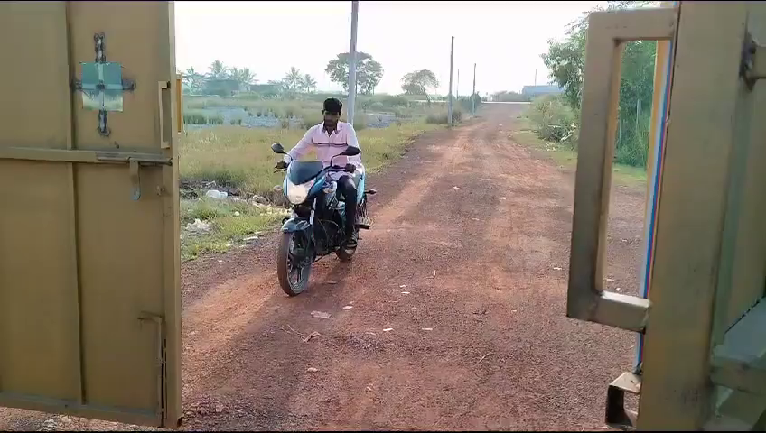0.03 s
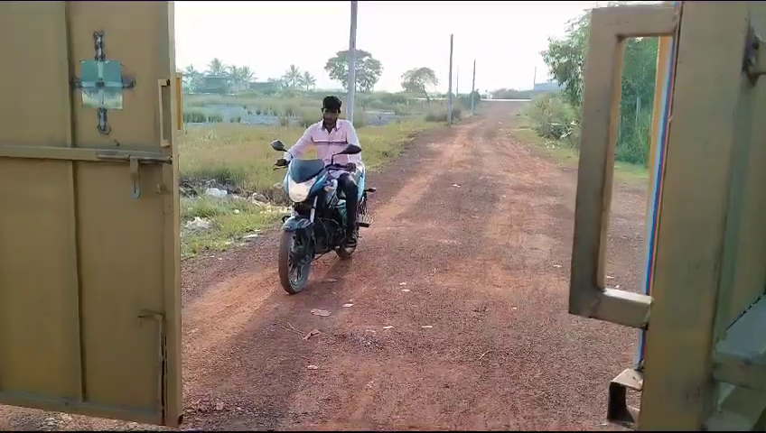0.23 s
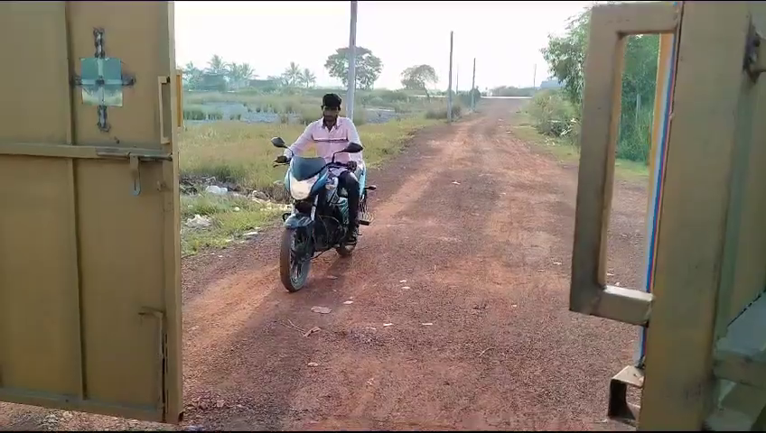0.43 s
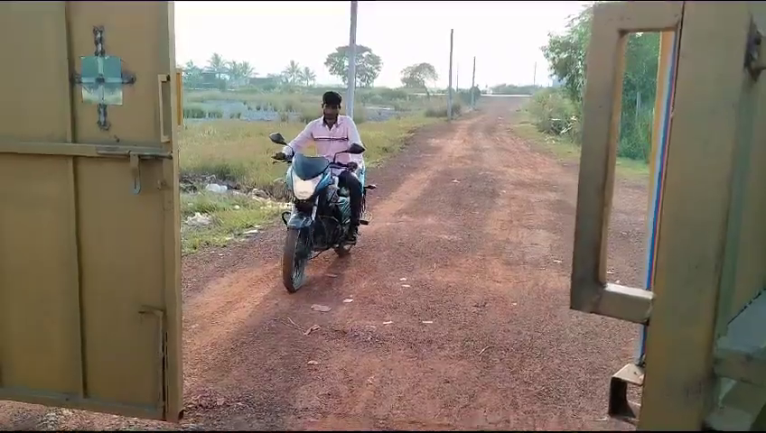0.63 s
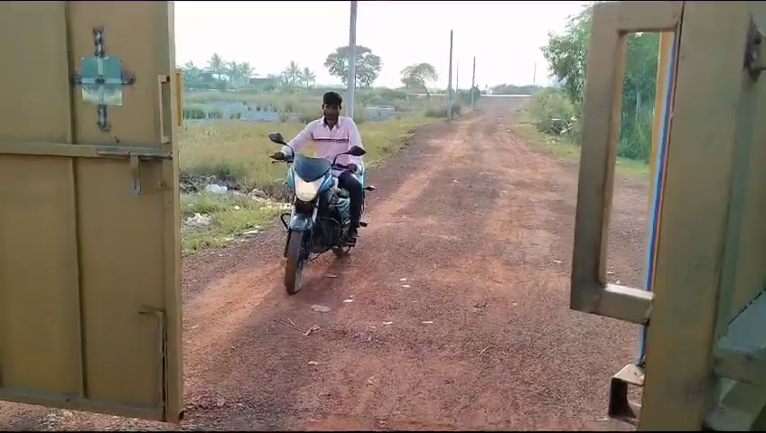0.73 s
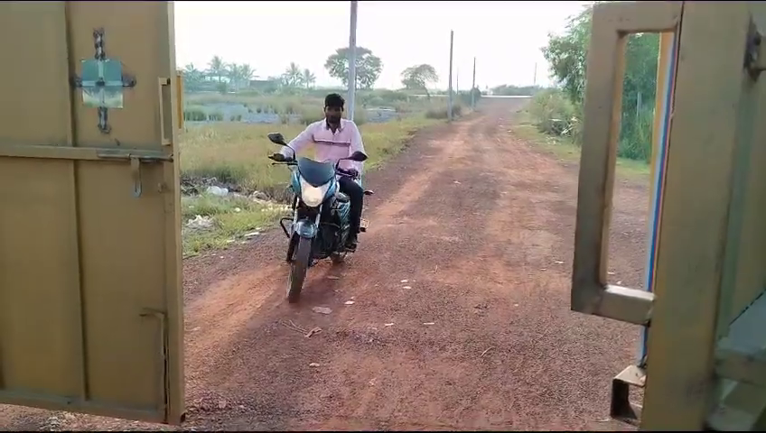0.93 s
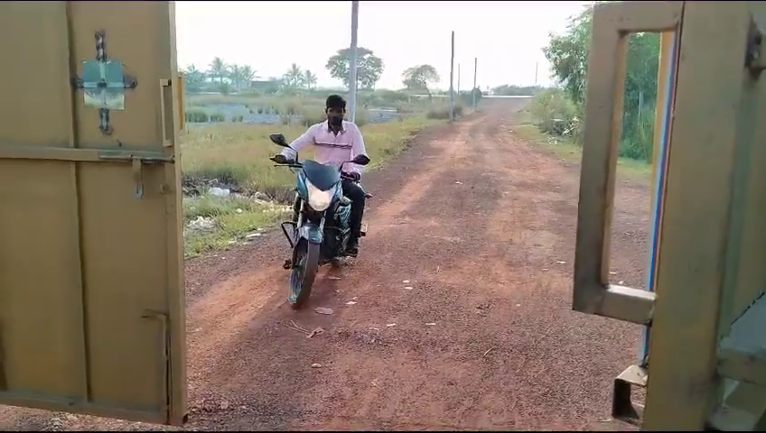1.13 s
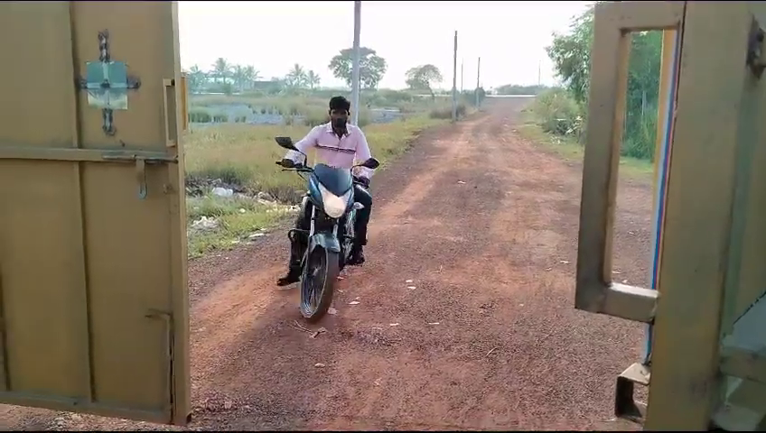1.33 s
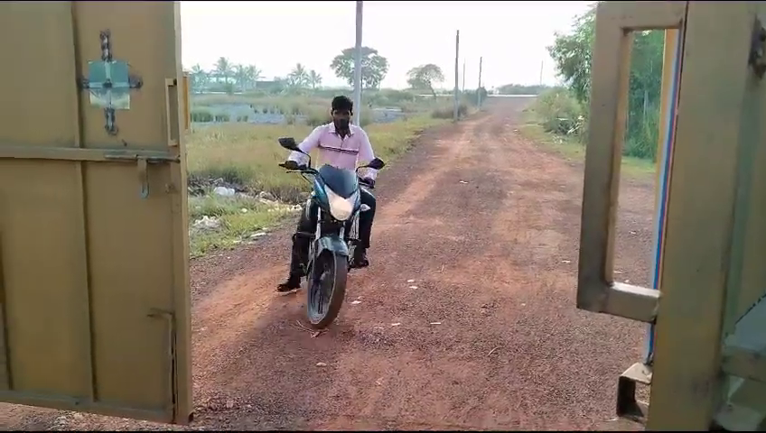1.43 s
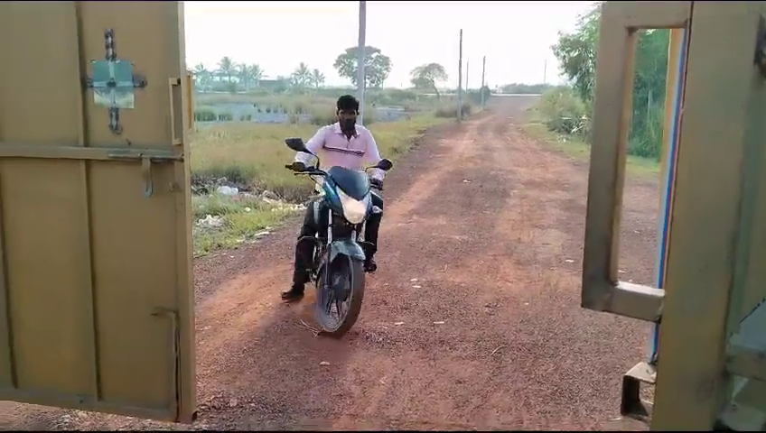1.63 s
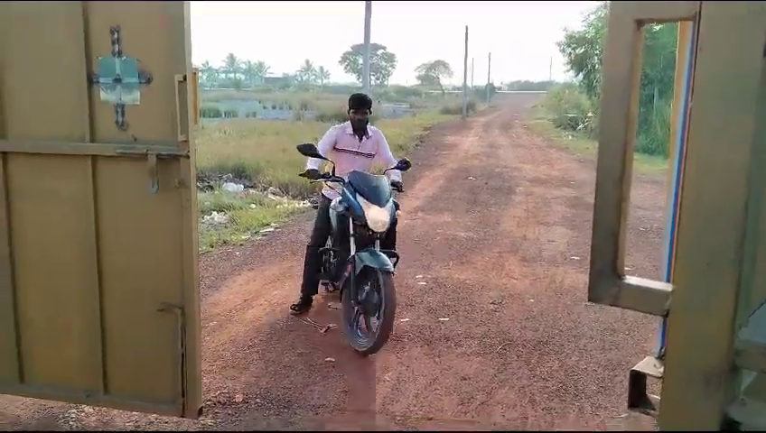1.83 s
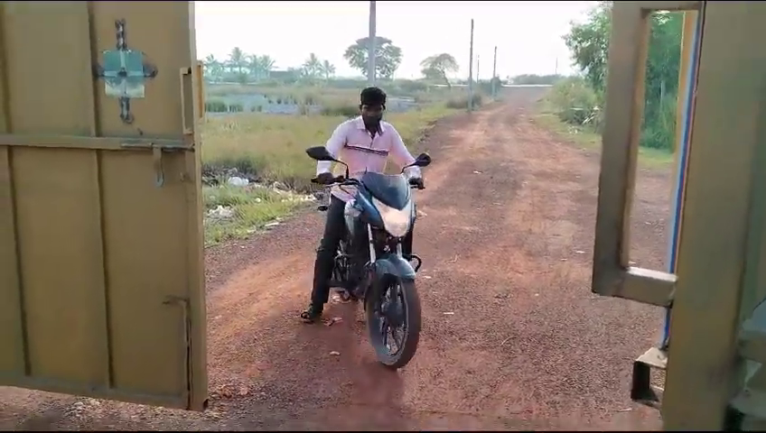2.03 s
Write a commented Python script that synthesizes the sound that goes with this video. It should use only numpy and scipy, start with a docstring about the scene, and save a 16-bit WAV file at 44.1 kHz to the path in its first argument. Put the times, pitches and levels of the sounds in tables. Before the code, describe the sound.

A single-cylinder motorcycle cuts in after a brief silence, puttering briskly with gear whine and rattle, then slows to a lumpy idle over snapping grit and revs slightly at the end; outdoors, close stereo microphone.

```python
"""A short silence, then a single-cylinder four-stroke motorcycle at a brisk beat, rolling up a dirt yard
towards a steel gate; it slows to idle and picks up again. Exhaust blows ring in the pipe over a noise rumble,
gear tones whine with the crank, grainy noise rattles the cases and a burst ticks the valve once a cycle.
Ringing clanks, brief low tones and pitched grit snaps join in; a pair of microphone ports hears it all."""
import sys
import numpy as np
from scipy import signal
from scipy.io import wavfile
from scipy.ndimage import uniform_filter1d

SR = 44100
rng = np.random.default_rng(int(sys.argv[2]) if len(sys.argv) > 2 else 0)


def generate_wav(signal):
    """Clip the signal to [-1, 1] and save it as 16-bit WAV at the path in sys.argv[1]."""
    frames = np.transpose(np.atleast_2d(signal))
    scaled = np.clip(frames, -1, 1) * 32767
    pcm = np.round(scaled).astype(np.int16)
    wavfile.write(sys.argv[1], SR, pcm)


def invert_db(level):
    """Linear amplitude ratio for a level in decibels (20 dB per decade), elementwise."""
    return 10 ** (np.asarray(level, dtype=float) / 20)


N = 91463

# Engine speed: time_s, firings_per_s
ENGINE_SPEED = [(0.2, 24.2), (0.32, 24.9), (0.45, 25.55), (0.56, 24.5), (0.66, 23.07), (0.76, 22.3),
                (0.88, 18.92), (1.0, 15.68), (1.12, 12.8), (1.25, 10.87), (1.45, 8.49), (1.68, 8.41),
                (1.85, 9.99), (2.08, 15.22)]
# Load on the engine: time_s, exhaust_db, rattle_db
ENGINE_LOAD = [(.24, -44.5, -39.5), (.4, -47.5, -37), (.51, -44.5, -35.5), (.555, -38, -38.5),
               (.6, -44, -36), (.64, -38, -37.5), (.69, -52, -37), (.77, -51, -38.5), (.82, -43.5, -39.5),
               (.94, -60, -40), (1.08, -46.5, -43.5), (1.28, -77, -42), (1.37, -65, -45.5),
               (1.47, -53.5, -42), (1.64, -58, -46), (1.75, -52, -46), (1.86, -43.5, -41.5),
               (1.91, -85, -44.5), (1.945, -46, -35.5), (1.99, -38, -43.5), (2.025, -46.5, -34.5),
               (2.07, -41, -40)]
# Exhaust pipe modes: pitch_hz, level_db (relative), t60_s
PIPE_MODES = [(126, -2.5, 0.064), (157.3, 1.5, 0.049), (199.5, -4.5, 0.046), (245.6, -6.5, 0.074),
              (305, -7, 0.065)]
# Colour of the gas rumble: pitch_hz, density_db (relative, per Hz)
RUMBLE_COLOUR = [(20, -15), (45, -4), (86, -10), (156, 0.5), (335, -8), (441, -16.5), (700, -25)]
# Gas rumble over time: time_s, level_db
RUMBLE_LEVELS = [(.24, -41.5), (.55, -43), (.85, -43), (1.1, -50), (1.4, -48.5), (1.7, -50), (2.07, -44.5)]
# Gear whine: time_s, then level_db of mesh multiples 1, 2, 3 and 4
WHINE_LEVELS = [(.23, -46.5, -45, -44.5, -56), (.36, -46, -43, -46.5, -54), (.48, -40.5, -39, -48.5, -52),
                (.58, -44.5, -46.5, -43, -45), (.72, -40.5, -49, -43, -49.5), (.86, -49, -47.5, -45.5, -53),
                (.98, -56, -46.5, -51, -52), (1.15, -57, -55, -62, -62), (1.35, -80, -80, -80, -80)]
# Colour of the rattle at high speed: pitch_hz, density_db (relative, per Hz)
FAST_COLOUR = [(350, 2), (444, -12.5), (909, -6.5), (1490, -14), (1920, -12), (2900, -15), (3190, -15),
               (3680, -14.5), (4390, -16), (7070, -20.5), (9110, -44.5), (15600, -48)]
# Colour of the rattle at idle: pitch_hz, density_db (relative, per Hz)
IDLE_COLOUR = [(350, -20.5), (538, -16), (591, -28), (651, -12), (800, -6), (1460, -9), (2440, -13),
               (3090, -11.5), (3460, -10.5), (7070, -21.5), (9260, -54), (15600, -50.5)]
# Resonances of the engine cases, plus a bright lift high in the treble (last row): pitch_hz, width_hz, lift_db
CASE_MODES = [(823, 140, 4), (907, 540, 3.5), (2482, 173, 8), (2786, 15, 11), (3610, 300, 7),
              (5780, 940, 5.5), (11570, 780, 9)]
# Valve modes: pitch_hz, level_db (relative), t60_s
VALVE_MODES = [(5450, 0, .014), (5900, -1, .014), (4150, -8, .015)]
# Valve tick over time: time_s, gain_db
TICK_GAINS = [(.24, -41), (.78, -42), (.84, -35), (1.02, -35), (1.08, -46), (1.15, -36), (1.25, -48)]
# Drive-train clanks as the load comes on: start_s, strength_db, rise_s
CLANK_TIMES = [(1.922, -53, 0.0086), (1.962, -55.5, 0.0056), (2.003, -52, 0.006), (2.035, -46, 0.0053)]
# Drive-train modes: pitch_hz, level_db (relative), t60_s
CLANK_MODES = [(910, -3, .03), (1500, -9, .012), (2422, -2, .025), (2885, -7, .02), (3575, 0, .02),
               (4188, -5, .015), (5443, -6, .015), (6896, -7, .01)]
# Low tones that swell for a moment: start_s, length_s, pitch_hz, level_db
LOW_TONES = [(0.267, 0.49, 328.6, -45), (0.35, 0.22, 152, -40.5), (0.562, 0.075, 295, -37.5),
             (0.686, 0.13, 363.7, -47.5), (0.755, 0.24, 248.8, -45.5), (1.106, 0.071, 482, -47.5),
             (1.19, 0.14, 245, -49.5), (1.324, 0.064, 160.2, -38.5)]
# Grit snaps under the tyres: start_s, strength_db, pitch_hz
GRIT_SNAPS = [(1.147, -20.5, 3260), (1.1762, -21, 1820), (1.2036, -22, 1630), (1.2488, -24.5, 2450),
              (1.2595, -44, 4200), (1.2982, -18.5, 2520), (1.3968, -29, 3380), (1.467, -16.5, 4300),
              (1.4787, -18, 3650), (1.5091, -17, 2660), (1.559, -26, 3510), (1.6822, -21, 3270),
              (1.6856, -16.5, 2270), (1.6924, -17, 2930), (1.8088, -19, 3480)]
# Likeness of the two ports: pitch_hz, likeness (1 = identical)
PORT_LIKENESS = [(60, 0.94), (130, 0.96), (290, 1), (640, 0.59), (1410, 0.38), (3100, 0.96), (6820, 0.22),
                 (15000, 0.21)]
# Balance of the ports: pitch_hz, left_minus_right_db
PORT_LEAN = [(60, 2), (130, -2.5), (290, 4), (640, -1.5), (1410, 2.5), (3100, 4), (6820, -7.5),
             (15000, -4.5)]
# Echoes off gate and ground, one row per port: delays_s
PORT_ECHOES = [
    [.0031, .0074, .013, 0.024],
    [.0043, .0062, 0.019, .024],
]

LEFT_LAG_S = .00007


def rms_one(x):
    """Scale a sound to rms 1."""
    return x / np.sqrt(np.mean(x ** 2) + 1e-20)


def in_time(rows):
    """Turn the columns of a timed table into curves."""
    times_s, *columns = np.transpose(rows)
    return [np.interp(np.arange(N) / SR, times_s, column) for column in columns]


def at_hz(points, hz):
    """Read a spectrum table along a log-frequency axis."""
    table_hz, values = np.transpose(points)
    return np.interp(np.log(hz), np.log(table_hz), values)


def drift(rate_hz):
    """Random wander, spread 1: noise through two equal one-pole lowpasses at this rate."""
    r = np.exp(-2 * np.pi * rate_hz / SR)
    noise = rng.standard_normal(N + SR)
    return rms_one(signal.lfilter([1], [1, -2 * r, r * r], noise)[SR:])  # first second lets it settle


def filtered(x, order, hz, kind="low"):
    """Butterworth filter."""
    return signal.sosfilt(signal.butter(order, hz, kind, fs=SR, output="sos"), x)


def ring(clicks, hz, t60_s):
    """Two-pole resonator: a unit click starts a decaying sine of initial height 1."""
    r, w = invert_db(-60 / (t60_s * SR)), 2 * np.pi * hz / SR
    return signal.lfilter([0, np.sin(w)], [1, -2 * r * np.cos(w), r * r], clicks + 1e-18)


def beats(turns, cycle_place, modes, spread_db, burst):
    """One burst per engine cycle excites all modes, with chance strength per blow and per mode."""
    at = np.flatnonzero(np.diff(np.floor(turns - cycle_place)))
    shared_db = rng.normal(0, spread_db, 80)
    out = 0
    for k, (hz, db, t60_s) in enumerate(modes):
        strength_db = db + shared_db + rng.normal(0, spread_db, 80)
        clicks = np.zeros(N)
        clicks[at] = (-1) ** k * invert_db(strength_db)[:len(at)]
        out = out + ring(burst(clicks), hz, t60_s)
    return out


def banded(white, low_hz, count, gain_db, patchy_db):
    """Third-octave stereo noise, each band with its own level, flicker, likeness and lean; left lags."""
    out = 0
    edges = low_hz * 2 ** (np.arange(count + 1) / 3)
    for k, (low, high) in enumerate(zip(edges, edges[1:])):
        mid, side = filtered(white[k % 2], 3, [low, high], "band")  # neighbours use different noise
        hz = np.sqrt(low * high)
        alike = np.clip(at_hz(PORT_LIKENESS, hz), -1, 1)
        half_lean_db = at_hz(PORT_LEAN, hz) / 2
        pair = np.sqrt(1 + alike) * mid + np.sqrt(1 - alike) * side * [[1], [-1]]
        flicker = invert_db(gain_db(hz) + patchy_db * drift(6.6))
        out = out + flicker * pair * invert_db(np.array([[half_lean_db], [-half_lean_db]]))
    out[0] = np.interp(np.arange(N) - LEFT_LAG_S * SR, np.arange(N), out[0])
    return out


def point_source(x, pan_db, echo_db=-13.5):
    """A dulled point source: panned, later on the left, with echoes of alternating sign at each port."""
    t = np.arange(N)
    x = filtered(x, 10, 7340)
    left = np.interp(t - LEFT_LAG_S * SR, t, x) * invert_db(pan_db / 2)
    out = np.array([left, x * invert_db(-pan_db / 2)])
    for port, delays_s in enumerate(PORT_ECHOES):
        for k, delay_s in enumerate(delays_s):
            out[port] += invert_db(echo_db) * (-1) ** k * np.interp(t - delay_s * SR, t, x, left=0)
    return out


def exhaust(turns, speed, level_db):
    """Soft pressure blows excite the pipe modes, once a cycle, over a noise rumble of gas."""
    lead_s, blow_s = 0.0121, .0022  # a blow starts this lead before its peak
    r = np.exp(-1 / (blow_s * SR))

    def soft_blow(clicks):
        """Slope of a pressure pulse that swells and dies."""
        return signal.lfilter([1, -1], [1, -2 * r, r * r], clicks)

    blows = beats(turns + lead_s * speed, 0.81, PIPE_MODES, spread_db=2.0, burst=soft_blow)
    blows = point_source(filtered(blows, 2, [110, 380], "band"), pan_db=-1.2, echo_db=-22.0)
    # even out the running level so that the load curve sets it
    blows = blows / np.sqrt(uniform_filter1d(np.mean(blows ** 2, axis=0), size=9000) + 1e-12)
    white = rng.standard_normal((2, 2, N))
    rumble = banded(white, 24.42, 14, lambda hz: at_hz(RUMBLE_COLOUR, hz), patchy_db=0.5)
    return invert_db(level_db) * blows + invert_db(in_time(RUMBLE_LEVELS)[0]) * rms_one(rumble)


def whine(turns):
    """Gear-mesh multiples follow the crank, which surges within each cycle; chance blurs each line."""
    teeth_per_firing, crank_ripple = 40.1, .014
    swell_db, rough_rad, wobble_hz = 3, 1.2, 50
    surge = crank_ripple * np.sin(2 * np.pi * turns) / (2 * np.pi)
    mesh = teeth_per_firing * (turns + surge)
    out = 0
    for multiple, db in enumerate(in_time(WHINE_LEVELS), 1):
        blur = invert_db(swell_db * drift(wobble_hz)) * np.exp(1j * rough_rad * drift(wobble_hz))
        line = np.real(blur * np.exp(2j * np.pi * multiple * mesh))
        out = out + invert_db(db) * rms_one(line)
    return point_source(out, pan_db=2.5)


def rattle(speed, level_db):
    """Dense grainy contacts, as flickering noise, ring the cases; their colour follows engine speed."""
    fast = np.clip((speed - 11) / 12, 0, 1)
    grain_db, chatter_db = 1.24 * drift(380), 1.53 * drift(54)
    white = rng.standard_normal((2, 2, N)) * invert_db(grain_db + chatter_db)

    def colour(hz):
        """Blend the idle and high-speed spectra."""
        return fast * at_hz(FAST_COLOUR, hz) + (1 - fast) * at_hz(IDLE_COLOUR, hz)

    contacts = banded(white, 381, 17, colour, patchy_db=2.0)
    out = contacts
    for hz, width_hz, lift_db in CASE_MODES:
        resonance = signal.lfilter(*signal.iirpeak(hz, hz / width_hz, SR), contacts)
        out = out + (invert_db(lift_db) - 1) * resonance
    running_rms = np.sqrt(uniform_filter1d(np.mean(out ** 2, axis=0), size=8000))
    return out / running_rms * invert_db(level_db)


def valve(turns):
    """A short gritty contact once a cycle rings the head."""
    burst_s = .004
    r = np.exp(-1 / (burst_s * SR))
    grain = rng.standard_normal(N)

    def gritty_contact(clicks):
        """Noise under a decaying envelope."""
        return grain * signal.lfilter([np.sqrt(2 * (1 - r))], [1, -r], clicks)

    ticks = beats(turns, -0.031, VALVE_MODES, spread_db=1.0, burst=gritty_contact)
    return point_source(invert_db(in_time(TICK_GAINS)[0]) * ticks, pan_db=-4)


def clanks():
    """Dense runs of drive-train contacts swell and die, ringing one shared set of modes."""
    t = np.arange(N) / SR
    shape = 0
    for start_s, db, rise_s in CLANK_TIMES:
        age = np.maximum(t - start_s, 0) / rise_s
        shape = shape + invert_db(db) * age * np.exp(1 - age)
    out = 0
    for hz, db, t60_s in CLANK_MODES:
        contacts = rng.standard_normal(N) * (rng.random(N) < .3)  # about three samples in ten
        out = out + invert_db(db) * ring(shape * contacts, hz, t60_s)
    return point_source(out, pan_db=0.58)


def hums():
    """Steady low sine tones that swell and fade."""
    t = np.arange(N) / SR
    out = 0
    for start_s, length_s, hz, db in LOW_TONES:
        swell = np.sin(np.pi * np.clip((t - start_s) / length_s, 0, 1)) ** 0.24
        out = out + invert_db(db) * swell * np.sin(2 * np.pi * hz * t)
    return point_source(out, pan_db=.5)


def grit():
    """Short dull snaps under the tyres, each a pair of opposed rings at its own pitch."""
    cycles = 4.0  # of the lower ring, within the t60 of both
    out = 0
    for start_s, db, hz in GRIT_SNAPS:
        click = np.zeros(N)
        click[int(start_s * SR)] = invert_db(db)
        out = out + ring(click, hz, cycles / hz) - 0.93 * ring(click, 1.305 * hz, cycles / hz)
    return point_source(filtered(out, 2, 7500), pan_db=1.5)


def scene():
    """Sum all sources of the bike, its engine sounds tied to one speed curve and its load."""
    speed, = in_time(ENGINE_SPEED)
    turns = -6.04 + np.cumsum(speed) / SR  # engine cycles, one firing each
    exhaust_db, rattle_db = in_time(ENGINE_LOAD)
    engine = exhaust(turns, speed, exhaust_db) + whine(turns) + rattle(speed, rattle_db) + valve(turns)
    return engine + clanks() + hums() + grit()


def band_limit(x):
    """A steep low-pass at the top of the band."""
    return signal.sosfilt(signal.butter(12, 15800, fs=SR, output="sos"), x)


def record(dry):
    """The microphone loses bass and is deaf around a treble notch; the sound switches on after silence."""
    bass_cut_hz, dip_hz, dip_width_hz = 101, 9400, 1730
    start_s, fade_s = .2285, 0.00046
    x = filtered(dry, 2, bass_cut_hz, "high")
    x = signal.lfilter(*signal.iirnotch(dip_hz, dip_hz / dip_width_hz, SR), x)
    switch_on = np.clip((np.arange(N) / SR - start_s) / fade_s, 0, 1)
    return band_limit(x * switch_on)


dry = scene()
out = record(dry)
generate_wav(out)
```